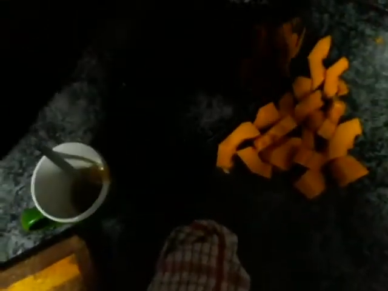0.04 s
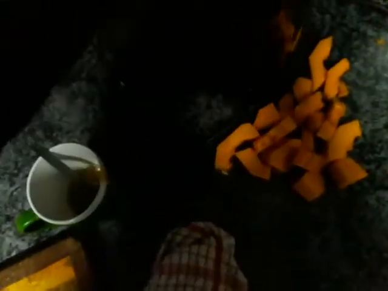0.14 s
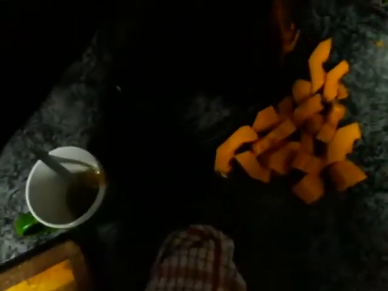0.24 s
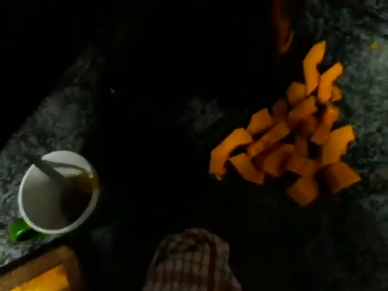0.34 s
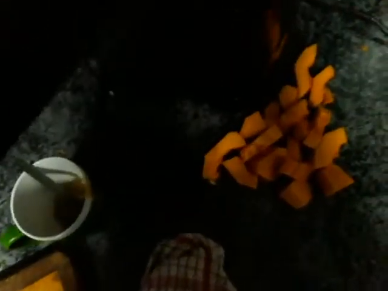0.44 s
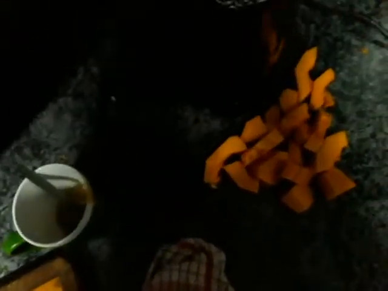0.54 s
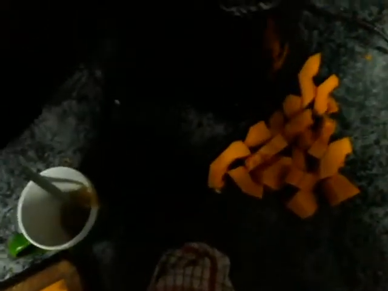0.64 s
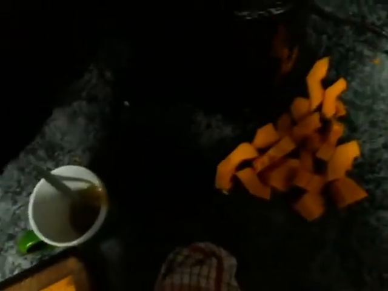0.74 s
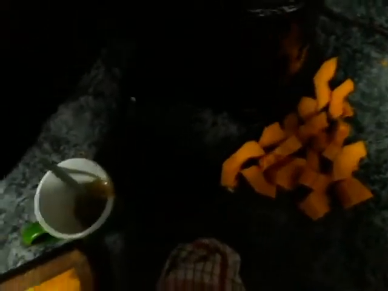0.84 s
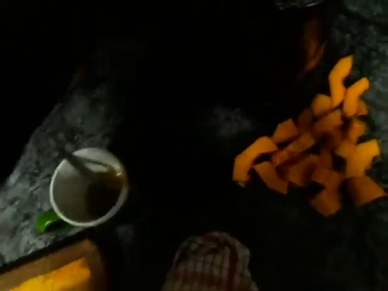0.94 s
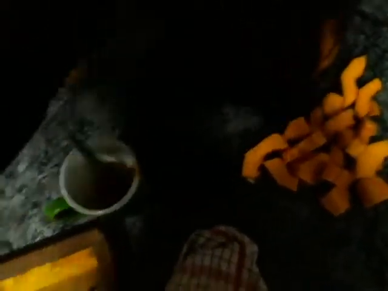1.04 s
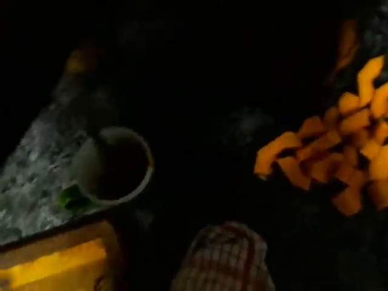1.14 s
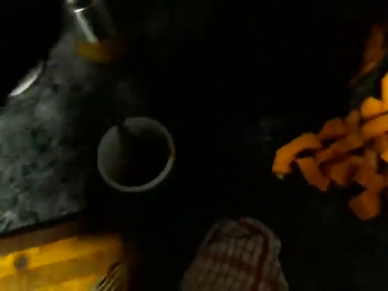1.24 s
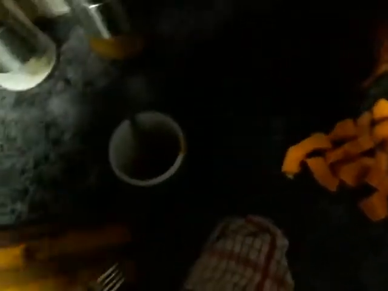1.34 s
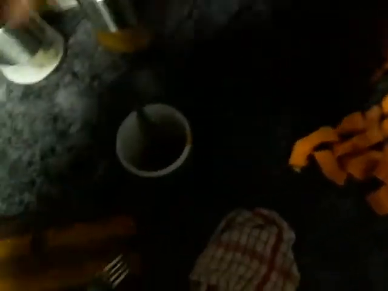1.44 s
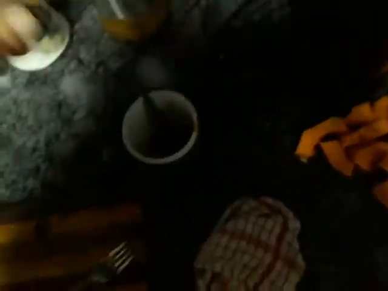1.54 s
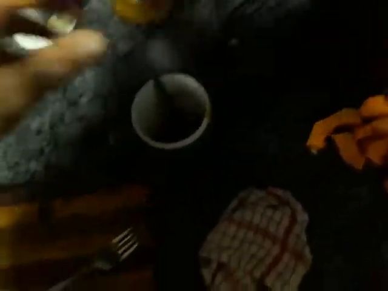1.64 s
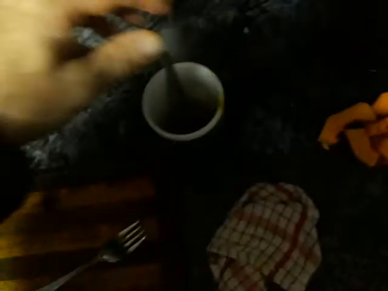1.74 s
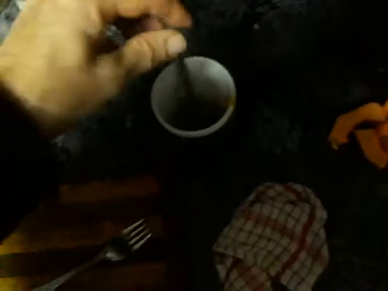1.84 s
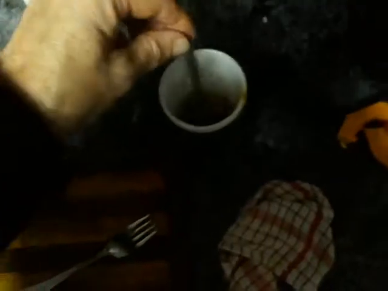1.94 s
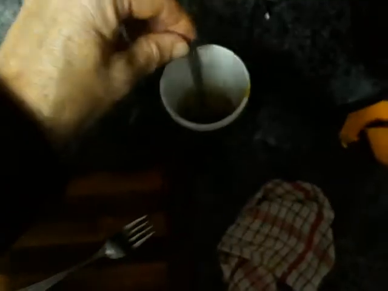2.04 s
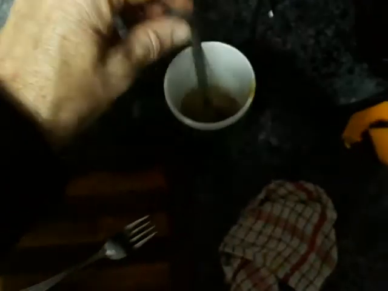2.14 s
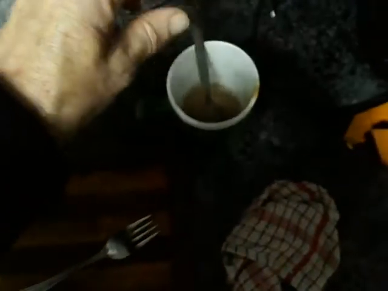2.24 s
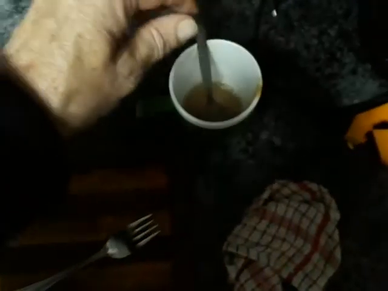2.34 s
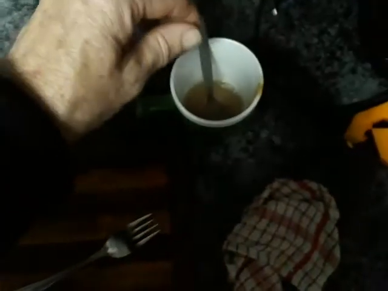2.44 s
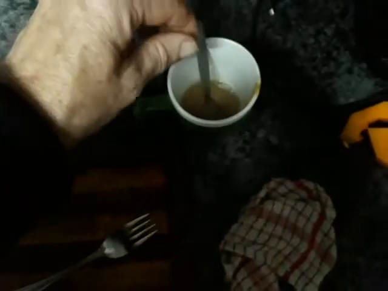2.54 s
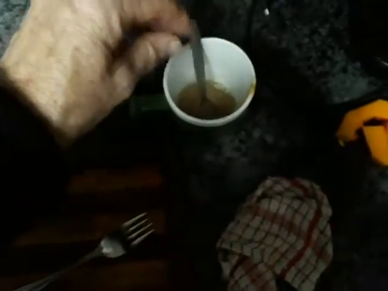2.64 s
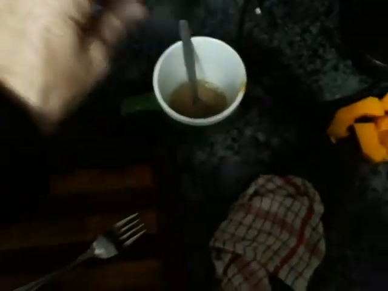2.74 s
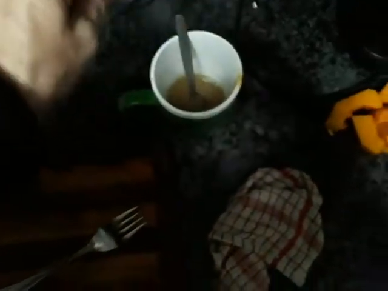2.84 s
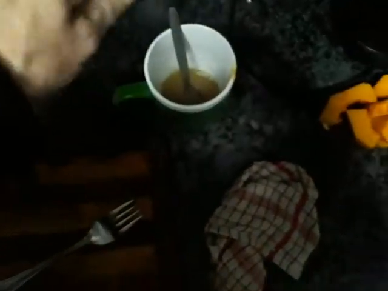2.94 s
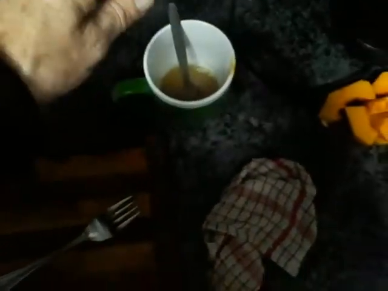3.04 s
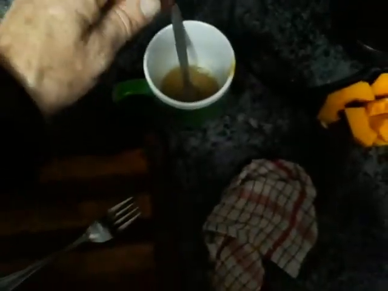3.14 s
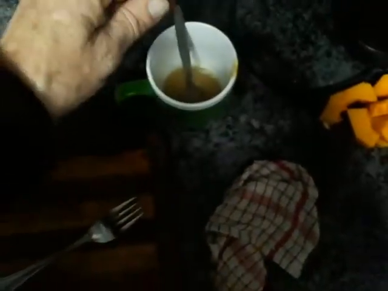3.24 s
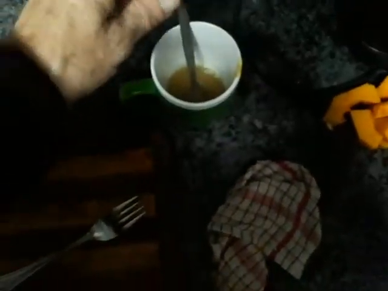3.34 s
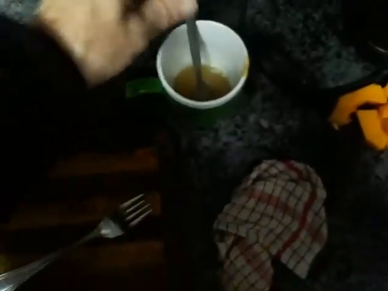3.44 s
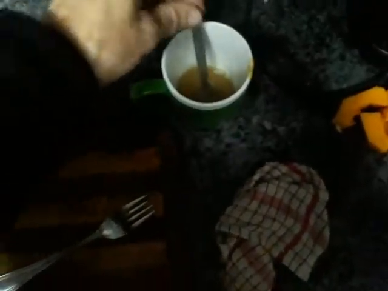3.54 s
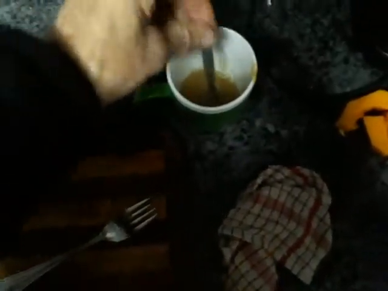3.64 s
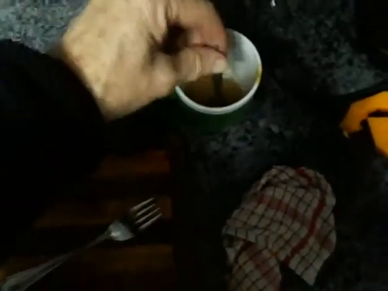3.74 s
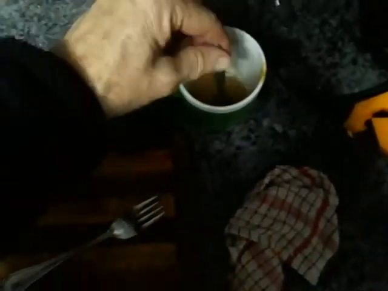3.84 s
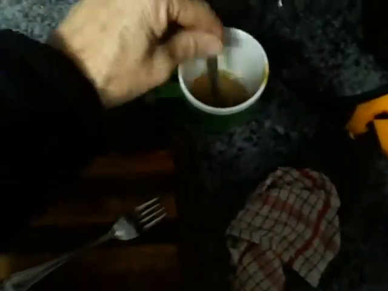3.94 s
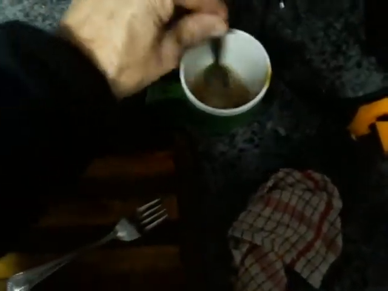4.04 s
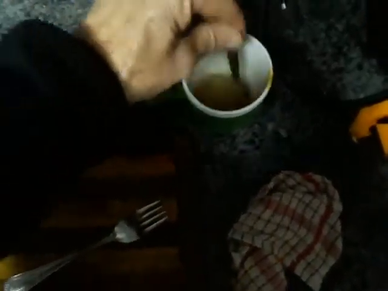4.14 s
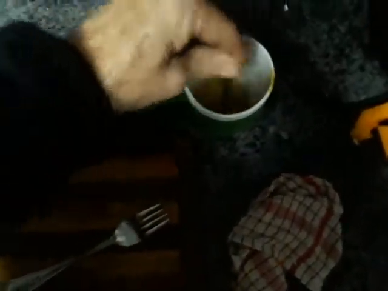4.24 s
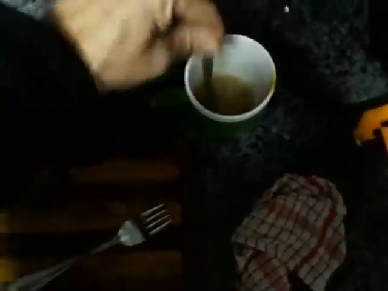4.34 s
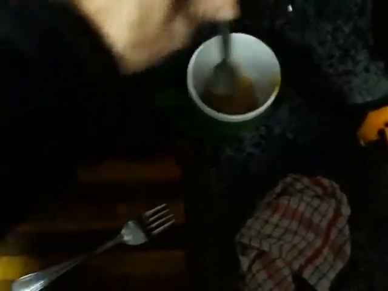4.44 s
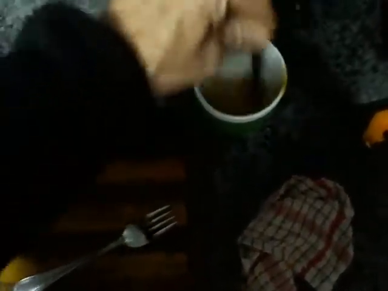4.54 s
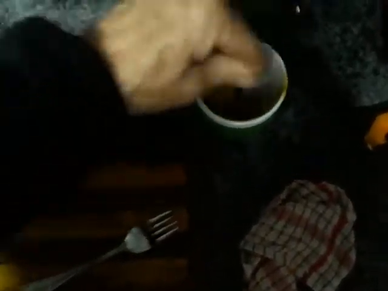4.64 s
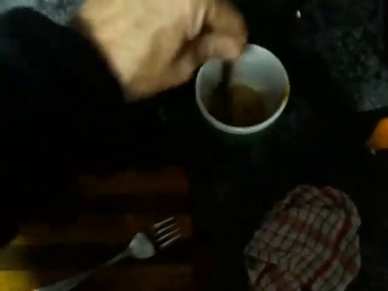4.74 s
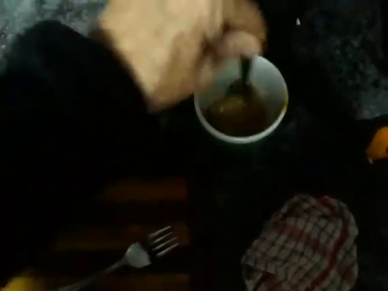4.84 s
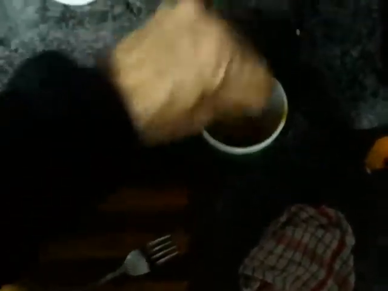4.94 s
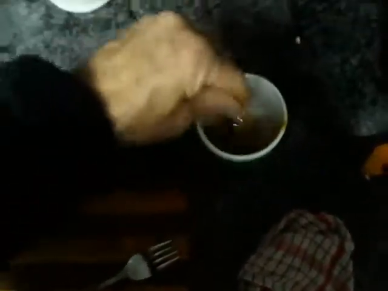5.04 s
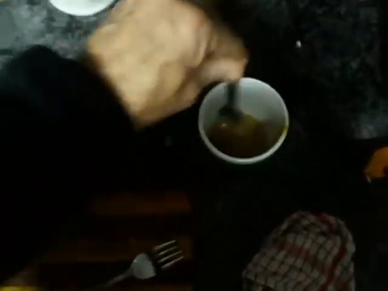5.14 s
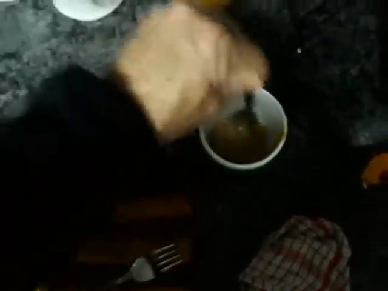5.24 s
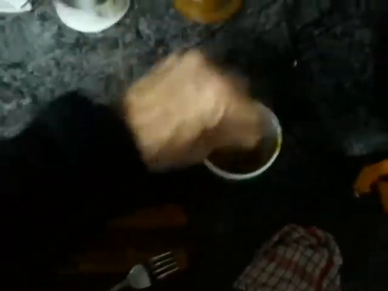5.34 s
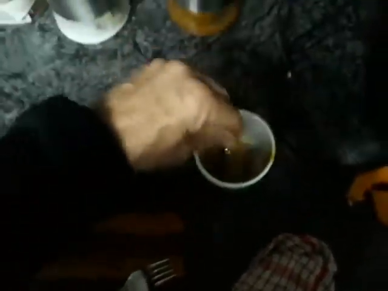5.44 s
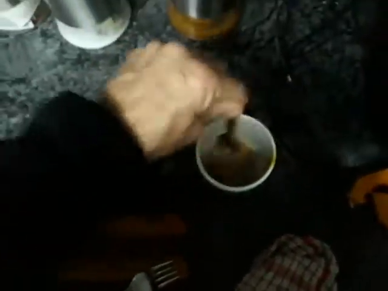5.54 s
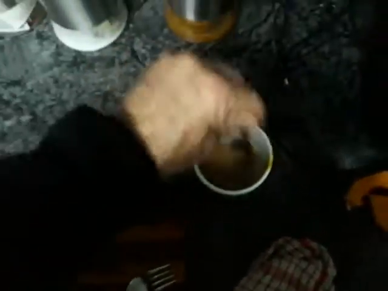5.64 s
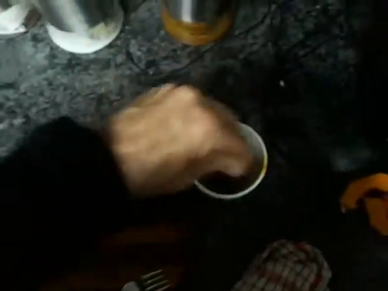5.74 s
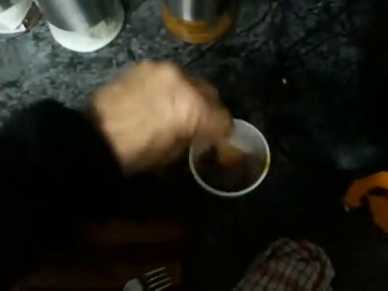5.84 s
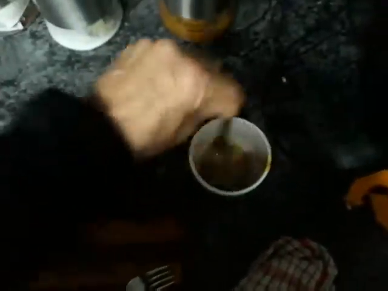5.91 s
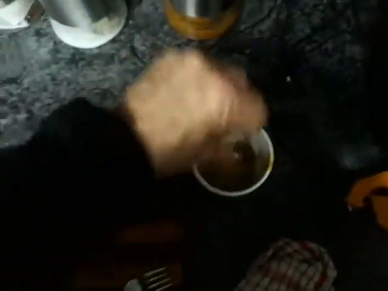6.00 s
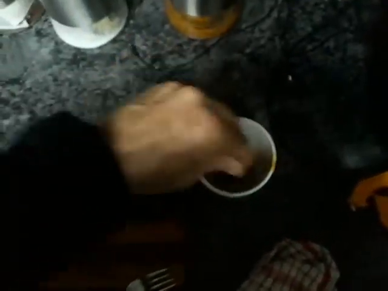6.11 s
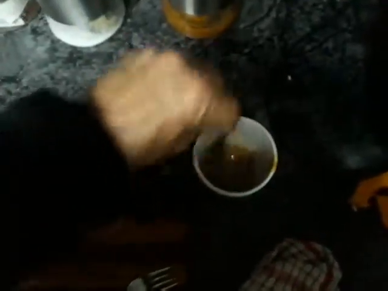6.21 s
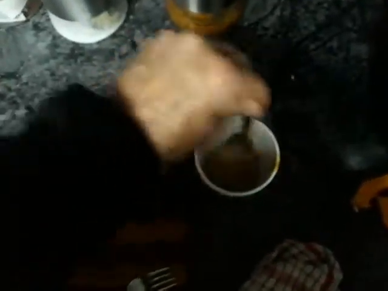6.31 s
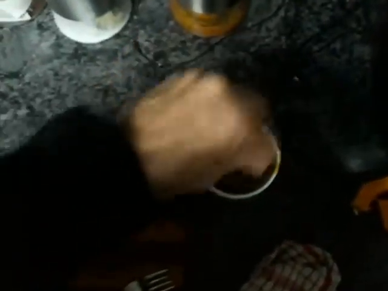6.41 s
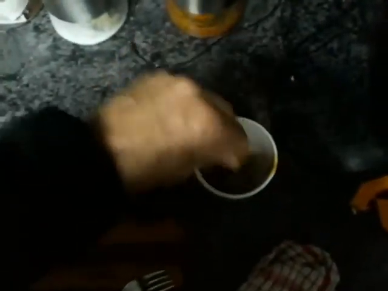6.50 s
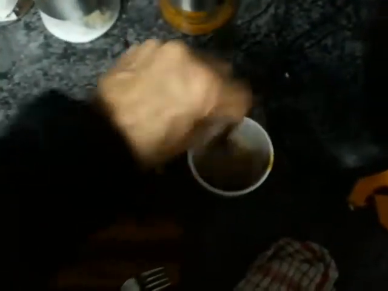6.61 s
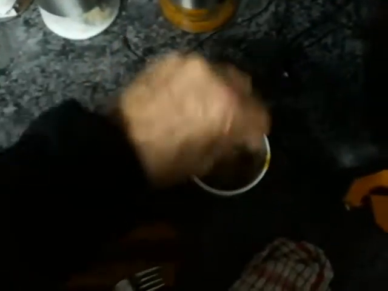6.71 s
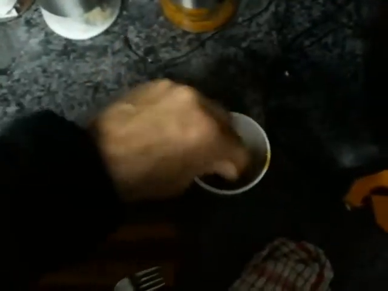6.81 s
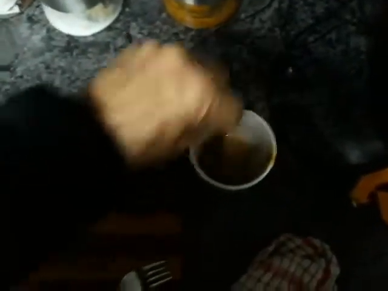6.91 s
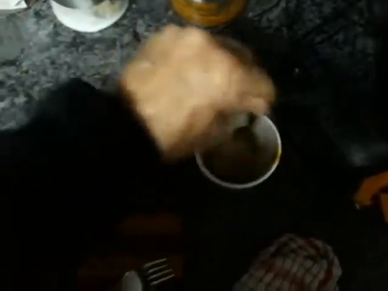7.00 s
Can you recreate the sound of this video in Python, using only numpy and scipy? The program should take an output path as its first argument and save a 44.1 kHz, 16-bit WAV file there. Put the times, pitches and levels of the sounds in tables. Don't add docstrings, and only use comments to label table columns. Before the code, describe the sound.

In a small hard kitchen with a low refrigerator hum, a wooden board rattles and thumps loudly on a stone counter within the first half second. Faint cloth and hand rustles follow for almost three seconds. A steel teaspoon then drops into a ceramic mug, bouncing with ringing clinks, and after a short pause stirs quickly, ticking the wall, scraping grit along the bottom and sloshing a little liquid. Close microphone, short room reflections.

```python
import sys
import numpy as np
from scipy import signal
from scipy.io import wavfile
from scipy.ndimage import uniform_filter1d

SR = 44100
rng = np.random.default_rng(int(sys.argv[2]) if len(sys.argv) > 2 else 0)


def dump(signal):
    limited = np.clip(np.atleast_2d(signal).T, -1, 1)
    pcm = np.round(limited * 32767).astype(np.int16)
    wavfile.write(sys.argv[1], SR, pcm)


def ratio(d):
    e = np.asarray(d, float) / 20
    return 10 ** e


N = 311610


def evened(x):
    return x / np.sqrt(np.mean(x ** 2) + 1e-20)


def read(points, hz):
    f, value = np.transpose(points)
    return np.interp(np.log(hz + 1), np.log(f + 1), value)


def curves(rows):
    s, *columns = np.transpose(rows)
    t = np.arange(N) / SR
    opening_s = t - s[0] + 0.02 * (s[0] < 0.1)
    closing_s = s[-1] + 0.01 - t
    gate = np.clip(np.minimum(opening_s, closing_s) / 0.01, 0, 1)
    return gate, *(np.interp(t, s, c) for c in columns)


def add(mix, s, sound):
    part = mix[round(s * SR):][:len(sound)]
    part += sound[:len(part)]


def colour(x, spectrum):
    hz = np.linspace(0, SR / 2, 257)
    gain = ratio(2 * np.maximum(read(spectrum, hz), -45))
    taps = signal.minimum_phase(signal.firwin2(511, hz, gain, fs=SR))
    return signal.oaconvolve(x, taps / np.linalg.norm(taps))[:len(x)]


def resonate(x, hz, width_hz):
    turn = np.exp(2j * np.pi * np.cumsum(hz * np.ones(len(x))) / SR)
    r = np.exp(-np.pi * width_hz / SR)
    return 2 * (turn * signal.lfilter([1 - r], [1, -r], x / turn)).real


def resonate_twice(x, hz, width_hz):
    return resonate(resonate(x, hz, width_hz), hz, width_hz)


def grit(per_s, spread_db):
    size = ratio(spread_db * np.minimum(rng.exponential(1, N), 4))
    return evened(size * rng.standard_normal(N) * (rng.random(N) < per_s / SR))


def flicker(per_s, depth_db):
    length = int(SR / per_s)
    smooth = uniform_filter1d(uniform_filter1d(rng.standard_normal(N), length), length)
    return ratio(depth_db * evened(smooth))


def patchy(x, depth_db):
    z = signal.stft(x, nperseg=256)[2]
    noise = rng.standard_normal(z.shape[::-1]).T
    patches = evened(uniform_filter1d(uniform_filter1d(noise, 3, 0), 8, 1))
    return signal.istft(z * ratio(depth_db * patches), nperseg=256)[1][:N]


def ring(modes):
    t = np.arange(SR // 2) / SR
    tones = sum(ratio(db - 60 * t / t60) * np.sin(2 * np.pi * hz * t) for hz, db, t60 in modes)
    return tones * (1 - np.exp(-t / 0.00018))


def struck(blows, shapes, gain_db, wobble_db):
    kept_db = -11.5
    t, blows, out = np.arange(N) / SR, np.array(blows), np.zeros(N)
    last = np.maximum(np.searchsorted(blows[:, 0], t) - 1, 0)
    before = np.maximum(last - 1, 0)
    age, old_age = t - blows[last, 0], t - blows[before, 0]
    swell = np.exp(-1 / (0.0018 * SR))
    for k, modes in enumerate(shapes):
        wobble = flicker(150, wobble_db) * flicker(60, 2.1)
        new_db, old_db = blows[last, 2 + k] + gain_db, blows[before, 2 + k] + gain_db + kept_db
        for hz, db, t60 in modes:
            level = ratio(new_db + db - 60 * np.abs(age) / t60) * (age > 0)
            level += ratio(old_db + db - 60 * np.abs(old_age) / t60) * (last > 0)
            level = signal.lfilter([1 - swell], [1, -swell], level)
            detune = 1 + 0.0012 * rng.standard_normal(len(blows))[last]
            out += wobble * level * np.sin(2 * np.pi * hz * np.cumsum(detune) / SR)
    return out


def cracks(blows, dullness, sharp_s, tail_s, tail_db, snap=0):
    t, out = np.arange(3000) / SR, np.zeros(N)
    decay = np.exp(-t / sharp_s) + ratio(tail_db) * np.exp(-t / tail_s)
    noises = rng.standard_normal((len(blows), len(t)))
    for row, dull, noise in zip(blows, dullness, noises):
        tilted = evened(signal.lfilter([1], [1, -np.clip(dull, -0.9, 0.95)], noise))
        add(out, row[0], ratio(1.96 * row[1] + 2.0) * snap * np.exp(-t * SR / 2))
        add(out, row[0], ratio(row[1]) * tilted * decay)
    return out


# f/Hz, level/dB
AIR = [(30, -38), (62, -76), (95, 1.5), (220, -12), (345, -5.5), (600, -10.5), (1400, -11), (2300, -9.5),
       (2650, -11.5), (3000, -19.5), (6000, -20), (8000, -28.5), (10000, -47.5), (15000, -33)]
# f/Hz, width/Hz, level/dB
HUM = [(341.6, 35, -61.5), (553, 25, -59)]
# multiple of 50.13 Hz, level/dB
MAINS = [(2, -59), (3, -59), (6, -72), (7, -63)]
# multiple of 48.57 Hz, level/dB
MOTOR = [(2, -69), (3, -67), (4, -69), (6, -70), (7, -57)]


def kitchen():
    frames, hz = N // 256 + 5, np.fft.rfftfreq(1024, 1 / SR)
    a, b, patches = rng.standard_normal((frames, 513, 3)).T
    patch_db = 1.6 * evened(uniform_filter1d(uniform_filter1d(patches, 14, 0), 5, 1))
    z = (a + 1j * b) * ratio(read(AIR, hz)[:, None] + patch_db)
    air = signal.istft(z, nperseg=1024, noverlap=768)[1][:N]
    air *= flicker(40, 1.3)
    hum = np.zeros(N)
    for f, width_hz, db in HUM:
        hum += ratio(db) * evened(resonate_twice(rng.standard_normal(N), f, width_hz))
    t = np.arange(N) / SR
    for base_hz, orders in (50.13, MAINS), (48.57, MOTOR):
        waver = flicker(6, 1.2)
        for k, db in orders:
            phase = 2 * np.pi * (k * base_hz * t + rng.random())
            hum += np.sqrt(2) * ratio(db) * waver * np.sin(phase)
    return ratio(-49) * evened(air) + hum


# t/s, crack/dB, body/dB, dullness 0-1
KNOCKS = [(0.015, -13, -10.5, 1), (0.128, -22, -14, 0.99), (0.1875, -14, -12, 1), (0.199, -20, -20, 1),
          (0.247, -19, -19, 0.98), (0.322, -5, -21.5, 0.31), (0.367, -19, -13, 0.4), (0.383, -5, -6.5, 0.2),
          (0.399, -7.5, -14, 0.85), (0.408, -3, -20, 0.66), (0.4134, -7, -2.5, 1), (0.42, -12.5, -5.5, 0.9),
          (0.443, -17, -4, 0.7), (0.4786, -15.5, -12, 0.95), (0.4858, -11.5, -5.5, 1)]
# t/s, force/dB, looseness/dB
SLIDE = [(0.0, -35.5, -13), (0.02, -27, 0), (0.07, -36, -3), (0.31, -60, 14), (0.362, -38.5, -0.5),
         (0.385, -22.5, -0.5), (0.415, -16, 1), (0.445, -23.5, 1), (0.485, -26.5, -1.5), (0.56, -59, 14),
         (0.62, -62, -8)]
# f/Hz, width/Hz, level/dB
BOARD = [(112.5, 3.1, -11.5), (161.5, 12, -0.5), (235.5, 15, -8), (268.5, 17, 4.5), (299.8, 27, 3),
         (325, 24, 5.5), (405.6, 9.8, 0), (446, 13, -8), (520, 12, -35), (624.5, 23, -10), (870, 50, -31),
         (1030, 22, -22)]
# f/Hz, level/dB
RATTLE = [(290, -25), (500, -18), (753, -6.5), (859, -20.5), (1070, -2), (1170, -10), (1840, -2.5),
          (2430, 1), (3770, -11), (4900, -7), (9740, -33), (15100, -80), (16500, -51)]


def board():
    gate, force_db, loose_db = curves(SLIDE)
    chatter = gate * grit(3000, 1.7) * flicker(120, 2.8)
    push = gate * ratio(force_db) * rng.standard_normal(N) * flicker(59, 3.5)
    body = np.zeros(N)
    for hz, width_hz, db in BOARD:
        body += ratio(db + 1) * resonate(push, hz, width_hz) * np.sqrt(100 / width_hz)
    rough = colour(chatter, RATTLE)
    dull = signal.lfilter(*signal.butter(3, 3300, fs=SR), rough)
    slide = ratio(force_db + loose_db) * (dull + ratio(-3.5) * (rough - dull))
    dullness = 2 * np.array(KNOCKS)[:, 3] - 1
    crack = ratio(-6.5) * colour(cracks(KNOCKS, dullness, 0.0026, 0.034, -18.5), RATTLE)
    modes = [(hz, db - 13, 1.86 / width_hz) for hz, width_hz, db in BOARD]
    boom = struck(KNOCKS, [modes], -8.0, wobble_db=3.5)
    return body + slide + corners() + crack + boom


# t/s, level/dB, f/Hz, t60/s
CORNERS = [(0.3217, -6.5, 2480, 0.012), (0.3217, -12, 5110, 0.01), (0.3217, -15, 3260, 0.0091),
           (0.385, -22, 2400, .03), (0.3992, -5.5, 1660, 0.011), (0.4083, -8.5, 2430, .025),
           (0.4133, -7, 2380, .03), (0.4195, -10, 2330, 0.027), (0.4782, -10.5, 2350, 0.017),
           (0.4852, -12.5, 1750, .018), (0.4858, -18, 2480, 0.013), (0.444, -17, 883, 0.034),
           (0.384, -19, 404, .06), (0.412, -10, 273, 0.056), (0.4194, -10.5, 323, .05),
           (0.43, -16, 160.6, 0.39), (0.483, -13, 341, 0.042), (0.1875, -23.5, 1126, 0.035)]


def corners():
    t, out = np.arange(2500) / SR, np.zeros(N)
    for s, db, hz, t60 in CORNERS:
        ping = ratio(db - 60 * t / t60) * np.sin(2 * np.pi * hz * t)
        add(out, s, ping * (1 - np.exp(-t / 0.0001)))
    return out


# t/s, level/dB, fine crackle re coarse brush/dB
RUSTLE = [(0.6512, -35, -8), (0.683, -33, -24), (0.7081, -37, -5), (0.7844, -61, -1), (0.8196, -33, 7),
          (0.8513, -46, -15), (0.9445, -67, -9), (0.9959, -33, -18), (1.1062, -45, -18),
          (1.156, -30.5, -31), (1.3671, -33, -6), (1.417, -27, -21), (1.5157, -42, -1), (1.555, -29.5, -18),
          (1.6325, -25, -20), (1.6749, -41, 7), (1.7806, -39, 0), (1.866, -34, 8), (1.9473, -48, 7),
          (1.988, -34, -2), (2.048, -27.5, -29), (2.1613, -49, -14), (2.195, -35, 0), (2.291, -43, 4),
          (2.3703, -42, -2), (2.5215, -40, -15), (2.5783, -36, -22), (2.6477, -42, -17),
          (2.8986, -27.5, -7.5), (3.015, -24.5, -29), (3.0897, -29, -18),
          (3.6027, -31.5, -18), (3.7224, -56, -17), (3.7693, -38, -2), (3.8834, -64, -10),
               (3.9729, -39.5, 7.5), (4.047, -29, -19), (4.1774, -62, -10)]
# f/Hz, level/dB
CLOTH = [(500, -55), (850, 10), (1300, -2), (2300, 6.5), (3000, -7.5), (5000, -31.5)]
# f/Hz, level/dB
HISS = [(600, -1), (1500, 3), (3500, 4.5), (4100, 12), (4500, 7), (5300, 11.5), (6000, 9), (7500, -2.5),
        (9000, -12), (12000, -72), (15000, -11), (15700, -7), (16000, -58)]


def rustle():
    crackle = evened(patchy(colour(grit(6000, 1.2) * flicker(45, 2.0), HISS), 3.0))
    brush = evened(patchy(colour(grit(6000, 1.5), CLOTH), 3.0))
    out = ratio(-68.5) * (crackle + ratio(9) * brush * flicker(31.0, 2.2))
    rise_s, fall_s = 0.0016, 0.027
    t = np.arange(-800, 5000) / SR
    touch = np.exp(-np.where(t < 0, -t / rise_s, (t / fall_s) ** 0.78))
    for s, db, fine_db in RUSTLE:
        start = round((s + t[0]) * SR)
        near = slice(start, start + len(t))
        out[near] += ratio(db - 16) * touch * (ratio(fine_db) * crackle[near] + brush[near])
    return out


# t/s, level/dB, f/Hz
SLIPS = [(3.2943, -13, 3800), (3.3017, -24, 3770), (3.307, -9.5, 2720), (3.3075, -15, 3730),
         (3.315, -10, 2796), (3.324, -16, 2940), (3.335, -23, 2660), (3.3663, -34, 2850),
         (3.431, -37, 3000), (3.464, -31, 2780), (3.478, -35, 2660), (3.535, -39, 2870),
         (4.2443, -16, 2800), (4.254, -11.5, 2740), (4.261, -15, 2850), (4.646, -24, 2620),
         (4.649, -19, 4150), (4.66, -15.5, 2820), (5.031, -14, 2600), (5.039, -19, 2700),
         (5.157, -9.5, 5320), (5.162, -18, 5000), (5.377, -16, 2790), (5.4186, -23, 2600),
         (5.427, -26, 2730), (5.435, -21, 2890), (5.715, -33, 4160), (5.765, -26, 4080), (5.789, -13, 2823),
         (5.7944, -9, 2812), (5.794, -18, 5270), (5.795, -24, 4170), (5.803, -15, 2775), (5.863, -26, 2940),
         (5.931, -27, 4050), (6.145, -17, 2930), (6.1535, -10.5, 2560), (6.162, -11, 2630),
         (6.497, -13, 2870), (6.5046, -12, 2910), (6.516, -10, 2865), (6.674, -25, 2570), (6.69, -26, 4700),
         (6.819, -24, 3240), (6.8405, -22, 2920), (6.849, -12, 3000), (6.857, -11.5, 2877)]


def slips():
    t60_s, gain_db = 0.03, -2.5
    t, out = np.arange(2500) / SR, np.zeros(N)
    for (s, db, hz), (gap, turn) in zip(SLIPS, rng.random((len(SLIPS), 2))):
        tone = np.sin(2 * np.pi * hz * t)
        tone += 0.46 * np.sin(2 * np.pi * (hz * (0.82 + 0.1 * gap) * t + turn))
        tone += ratio(-13.5) * (hz < 3500) * np.sin(2 * np.pi * 1.8 * hz * t)
        add(out, s, ratio(db + gain_db - 60 * t / t60_s) * tone * (1 - np.exp(-t / 0.00052)))
    return out


def by_place(blows, lobes):
    s, first_db, ring_db, place_deg, hard_db = np.transpose(blows)
    fed = []
    for m, turn_deg, share in lobes:
        motion = abs(np.cos(np.radians(m * place_deg - turn_deg))) + 0.03
        fed.append(ring_db + share * hard_db + 20 * np.log10(motion))
    return np.transpose([s, first_db, *fed])


# t/s, tick/dB, ring/dB, place from handle/deg, hardness fed to finer shapes/dB
FALL = [
    (3.2956, -10.5, -22.5, 143, -7),
    (3.3035, -6, -20, 88, -10.5),
    (3.3663, -12.5, -34.5, 110, -8),
    (3.431, -22.5, -51, 160, -4),
    (3.4654, -22, -52, 140, -7),
    (3.5359, -20.5, -64, 105, 10.5),
]
FIRST_TURNS = [(4.114, -29, -66, 73.0, 14), (4.2302, -0.5, -28, 46, -6), (4.237, -3, -24, 46, 7.5),
               (4.41, -2, -24.5, 74.5, 12), (4.4523, -0.5, -25, 77, 10), (4.533, -2.5, -18, 85, -1),
               (4.594, -9, -20, 91, -13), (4.6183, -13.5, -31.5, 110, -2), (4.683, -15, -41, 140, -17),
               (4.7874, -8.5, -32, 170.0, 9), (4.955, -25, -67, 53, 17), (4.999, -3.5, -22.5, 27, 0),
               (5.005, -7.5, -27, 44, 2), (5.1544, -6.5, -29.0, 74.0, 11), (5.219, -4.5, -33, 88, -12),
               (5.267, -3.5, -26.5, 4.1, -4.5), (5.3527, -8.5, -28.5, 92, -6),
               (5.377, -7.5, -33.5, 79, 6.5)]
STEADY_TURNS = [(5.4268, -15, -30, 79.6, -3), (5.4674, -21, -43, 164, -6),
                (5.5508, -16.5, -40.5, 163.8, 20), (5.7012, -17.5, -28, 58, 0), (5.9155, -13, -39, 65.4, 4),
                (6.0473, -11, -28, 54, 6.5), (6.1154, -13.5, -29.5, 157.3, -4),
                (6.1528, -7.5, -39, 125, 16), (6.2632, -7, -40.5, 34.5, 16),
                (6.4041, -12, -28.5, 111.6, 2.5), (6.4665, -18.5, -49, 104, 11),
                (6.5057, -10, -32.5, 32, 10.5), (6.5564, -20.5, -55, 28.6, 14),
                (6.629, -14, -43.5, 114, 10), (6.714, -32, -36, 125, -24), (6.7233, -12.5, -25, 176.4, -14),
                (6.802, -27, -47.5, 103, 12), (6.841, -17, -34, 50.6, 0), (6.9688, -7, -26.5, 127.4, -3.5)]
# f/Hz, level/dB, t60/s
WALL = [
    [(2068, -7, 0.2)],
    [(2229, 4.5, 0.22), (2256, -8, 0.15)],
    [(5110, -1, 0.09), (5060, -13, 0.1), (4940, -8, 0.037)],
    [(6153, -0.6, 0.165), (6250, -13, 0.13)],
]
# f/Hz, level/dB, t60/s
FREE_WALL = [
    [(2068, -2, 0.26)],
    [(2300, -8, 0.12), (2229, -8, .25), (2659, -10, .1), (2993, -9, .14)],
    [(5120, 6, 0.22), (4860, -11, .15)],
    [(6130, -7, 0.35), (6280, 1, 0.27), (6400, -12, 0.17)],
]
WALL_LOBES = [(2, 0, 0), (2, 90, 0), (3, 60, 1), (4, 30, 1)]
# t/s, sizzle/dB, ring/dB, place along spoon/deg, hardness/dB
SPOON_BLOWS = [(3.2945, -8, -27.5, 117.0, 23.5), (4.1135, -27, -56, 90, -4), (4.2303, -6, -11, 7.1, -1.5),
               (4.41, -11, -26.5, 123.0, 23), (4.451, -10, -42, 170, 7.0), (4.5316, -21, -23, 21, -30),
               (4.787, -52.0, -23, 120, -24), (4.9983, -32, -9, 150, -43), (5.1522, -43.0, -24.5, 69, 0),
               (5.2666, -28, -14, 179.0, -33), (5.3757, -45.0, -12.5, 146, -51),
               (5.5505, -55.0, -37, 124.0, 6), (5.9145, -42, -29, 124.0, -3), (6.262, -39, -19.5, 190, -1),
               (6.967, -38, -17.5, 114, -4)]
# f/Hz, level/dB, t60/s
SPOON = [
    [(3170, 0.031, 0.013)],
    [(3990, -7.5, 0.2), (4010, -11, 0.027)],
    [(8580, 1, 0.042)],
    [(10160, -11.5, 0.017), (11400, -25.5, 0.13)],
]
SPOON_LOBES = [(1, 0, 0), (2, 90, .3), (3, 90, .8), (4, 45, 1)]


def clinks():
    wobble_db = 2.1
    free = struck(by_place(FALL, WALL_LOBES), FREE_WALL, 1.0, wobble_db / 2)
    wall = struck(by_place(FIRST_TURNS + STEADY_TURNS, WALL_LOBES), WALL, 1.9, wobble_db)
    spoon = struck(by_place(SPOON_BLOWS, SPOON_LOBES), SPOON, -2.1, wobble_db)
    return free + wall + spoon


# f/Hz, level/dB
TICK = [(70, -45), (180, -19), (300, -19.5), (682, -16.5), (1500, -26), (2100, -2.5), (3530, -5.5),
        (5100, -2.5), (6340, 2), (7890, -7), (8580, -15), (9810, -24), (14900, -15.5), (16500, -37)]


def ticks():
    blows = FALL + FIRST_TURNS + STEADY_TURNS
    _, tick_db, _, _, hard_db = np.transpose(blows)
    dullness = 0.55 - hard_db / 90 - (tick_db + 12) / 35
    dullness = dullness + 0.54 * np.tanh(rng.standard_normal(len(blows)))
    contact = colour(cracks(blows, dullness, 0.00052, 0.0062, -7, snap=1.3), TICK)
    sizzle = cracks(SPOON_BLOWS, np.zeros(len(SPOON_BLOWS)), 0.0019, 0.0098, -30)
    band = signal.butter(3, (12500, 16000), "band", fs=SR, output="sos")
    return ratio(-12.5) * contact + ratio(-11.5) * signal.sosfilt(band, sizzle)


# t/s, level/dB, f/Hz
SLAPS = [(3.295, -28, 165), (3.297, -25, 620), (4.234, -19, 570), (4.456, -17.5, 598), (4.682, -23, 1187),
         (5.002, -24, 576), (5.221, -20, 568), (5.376, -18.5, 550), (5.429, -18.5, 610),
         (6.155, -19.5, 624), (6.633, -27, 610), (6.723, -26, 1560)]


def slaps():
    t, out = np.arange(2500) / SR, np.zeros(N)
    for s, db, hz in SLAPS:
        plop = ratio(db - 9.5 - 60 * t / 0.051) * np.sin(2 * np.pi * hz * (t + 2.0 * t ** 2))
        add(out, s, plop * (1 - np.exp(-t / 0.0013)))
    return out


# t/s, pressure/dB, place -1 middle to 1 wall
SCRAPE = [(4.0, -91, .1), (4.29, -44.5, 0.55), (4.43, -43, 1), (4.64, -43, -0.3), (4.9, -42, 0.55),
          (4.97, -70, -0.35), (5.06, -36, 0.1), (5.2, -41, 0.33), (5.42, -43.5, -0.88), (5.58, -38, 0.46),
          (5.68, -48.5, 0.28), (5.8, -38.5, 0.33), (6.01, -42.5, 0.93), (6.26, -40.5, -0.11),
          (6.6, -43.5, 0.22), (6.78, -43.5, 1), (7.07, -45, -0.53)]
# t/s, level/dB, hollow f/Hz
DIGS = [(4.263, -25, 2680), (4.651, -23, 2710), (5.036, -18, 2730), (5.424, -20.5, 2830),
        (5.796, -21.5, 2800), (6.159, -18.5, 2630), (6.513, -18, 2850), (6.849, -19, 2870)]
# t/s, level/dB, hollow f/Hz, fall/s
CHATTERS = [(3.297, -20, 3750, .014), (3.2975, -37, 640, .02), (3.308, -18, 2700, .018),
            (4.1135, -33, 3200, .0035), (4.453, -38, 900, .012), (4.9985, -14, 4090, .0045),
            (5.002, -33, 800, .015), (5.379, -35, 1200, .008), (5.385, -32, 427, .023),
            (6.154, -38, 1000, .012), (6.7255, -34, 1460, .007)]


def scrape():
    place_db, hollow_db, hiss_db, wall_db = 12.5, -16, -11.5, -17
    gate, press_db, place = curves(SCRAPE)
    rub = gate * grit(5000, 3.2) * flicker(68, 3.5)
    hollow = ratio(hollow_db - place_db * place) * evened(resonate_twice(rub, 3120, 300))
    walls = evened(signal.oaconvolve(rub, ring(sum(WALL, []) + SPOON[1]))[:N])
    walls = ratio(wall_db + place_db * place) * walls
    hiss = ratio(hiss_db) * evened(patchy(colour(rub, HISS), 5.0))
    out = ratio(press_db) * (hollow + hiss + walls)

    t = np.arange(-2000, 5000) / SR
    surges = [(*row, 0.011, 0.0058) for row in DIGS]  # rise/s, fall/s
    surges += [(s, db, hz, 0.0008, fall_s) for s, db, hz, fall_s in CHATTERS]
    noises = rng.standard_normal((len(surges), len(t)))
    for (s, db, hz, rise_s, fall_s), noise in zip(surges, noises):
        envelope = np.exp(-np.where(t < 0, -t / rise_s, (np.abs(t) / fall_s) ** 1.03))
        press = noise * np.abs(noise) * envelope
        tone = resonate_twice(press, hz, 430)
        tone += ratio(-12.0) * resonate(press, 1.2 * hz, 115)
        tone += ratio(-44.0) * resonate(press, 2.1 * hz, 120)
        tone += ratio(-26.5) * colour(press, HISS)
        add(out, s + t[0], ratio(db + 5) * tone / np.abs(tone).max())
    return out


def slosh():
    gate, press_db, _ = curves(SCRAPE)
    t, out = np.arange(1500) / SR, np.zeros(N)
    laps, size = grit(400, 2.0), rng.integers(0, 10, N)
    for k, hz in enumerate(np.geomspace(380, 1900, num=10)):
        lap = np.sin(2 * np.pi * hz * (t + 6 * t ** 2)) * np.exp(-t * hz / 5)
        lap *= 1 - np.exp(-t / 0.0023)
        out += signal.oaconvolve(laps * (size == k), lap / np.linalg.norm(lap))[:N]
    return gate * ratio(press_db - 13) * evened(out)


# start/s, length/s, level/dB, steepest tilt after start/s
GLIDES = [(4.323, 0.086, -47, 0.088), (4.59, 0.032, -51, 0.031), (4.733, 0.035, -49, 0.14),
          (5.154, 0.024, -34, 0.011), (5.498, 0.025, -40, 0.083), (5.561, 0.051, -39, 0.037),
          (5.62, 0.034, -43, -0.073), (5.868, 0.056, -48, 0.09), (5.921, 0.15, -42, 0.037),
          (6.297, 0.046, -37.5, 0.066), (6.644, 0.062, -36, 0.0215), (6.997, 0.048, -38, 0.02)]
# multiple of pitch, width/Hz, level/dB
BOWL = [(.55, 265, -7), (.78, 300, -15.5), (0.998, 220, -6), (1.42, 500, -12.5), (2.85, 1220, -19)]


def glide():
    flat_hz, tilted_hz, tilt_s = 4700, 5410, 0.024
    rub, t = grit(8000, 1.5) * flicker(60, 2.2), np.arange(N) / SR
    moving, press_db, _ = curves(SCRAPE)
    tilt, level = 0.12 * flicker(15, 5), moving * ratio(press_db - 9)
    for start, length, db, steepest in GLIDES:
        gate = np.clip(np.minimum(t - start, start + length + 0.01 - t) / 0.02, 0, 1)
        tilt += (gate > 0) * np.exp(-((t - start - steepest) / tilt_s) ** 2)
        level += gate * ratio(db)
    hz = flat_hz + (tilted_hz - flat_hz) * tilt
    song = np.zeros(N)
    for k, width_hz, db in BOWL:
        song += ratio(db) * tilt ** max(k - 1, 0) * evened(resonate_twice(rub, k * hz, width_hz))
    return patchy(level * song, 3)


# f/Hz, t60/s
ROOM = [(200, 0.42), (1000, 0.39), (3000, 0.16), (8000, 0.2), (16000, 0.24)]


def room(x):
    taps = np.zeros(SR // 2)
    at = np.arange(120, SR // 2 - 20, 20)
    taps[at + rng.integers(0, 20, len(at))] = rng.choice([-1., 1.], len(at))
    hz, t, z = signal.stft(taps, SR, nperseg=256)
    tail = signal.istft(z * ratio(-60 * t / read(ROOM, hz)[:, None]), SR, nperseg=256)[1]
    return signal.oaconvolve(x, tail / np.linalg.norm(tail))[:N]


def scene():
    tick, wood = ticks(), board()
    mug = clinks() + scrape() + glide() + slaps() + slips() + slosh()
    echo = room(ratio(-9.0) * (mug + tick) + ratio(-12.5) * wood)
    soft = mug + wood + echo + kitchen() + rustle()
    edge = signal.ellip(8, 0.5, 60, 15800, fs=SR, output="sos")
    return (tick + signal.sosfilt(edge, soft))[None]


def roll_off(x):
    return signal.sosfilt(signal.butter(12, 16970, fs=SR, output="sos"), x)


def record(dry):
    dry = signal.sosfilt(signal.butter(3, 62, "high", fs=SR, output="sos"), dry)
    return roll_off(1.246 * np.tanh(dry / 1.166))


dry = scene()
out = record(dry)
dump(out)
```